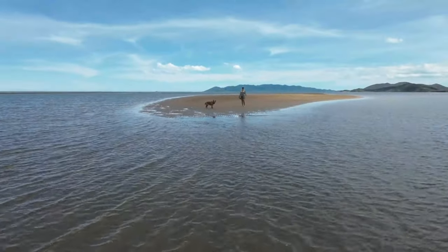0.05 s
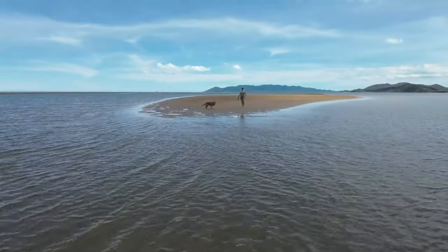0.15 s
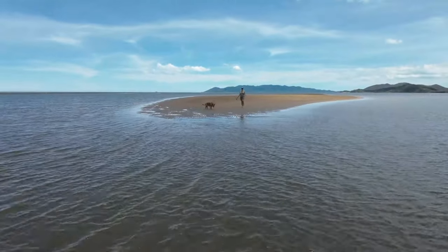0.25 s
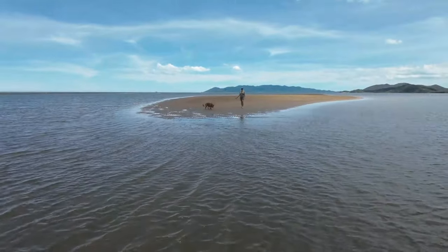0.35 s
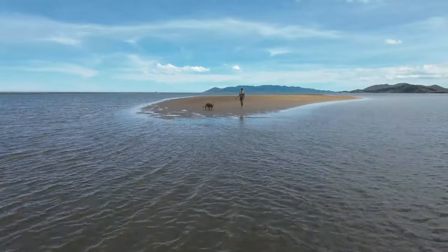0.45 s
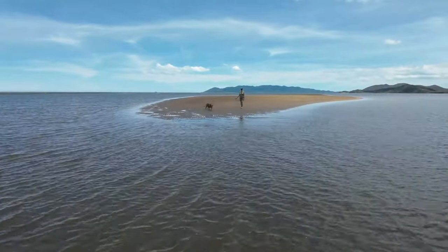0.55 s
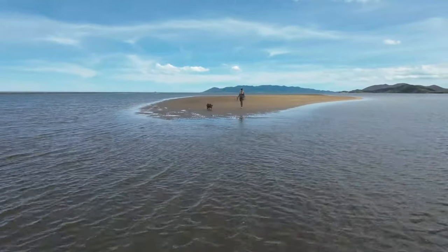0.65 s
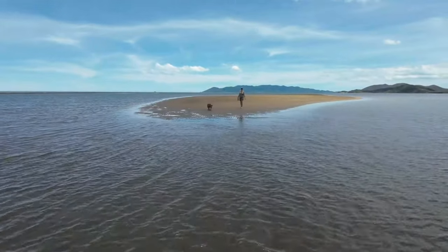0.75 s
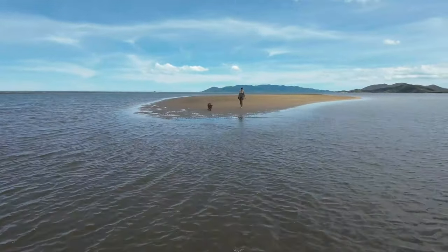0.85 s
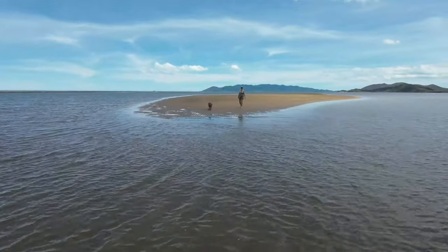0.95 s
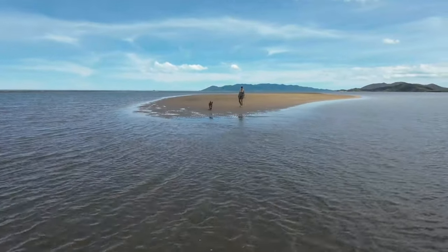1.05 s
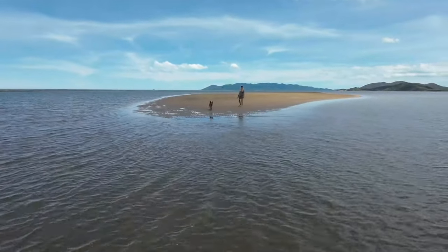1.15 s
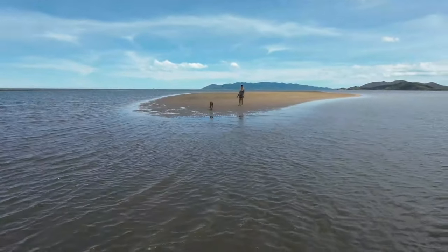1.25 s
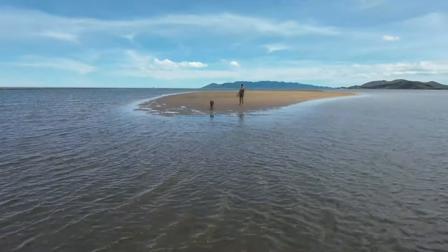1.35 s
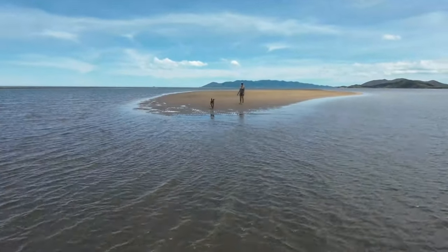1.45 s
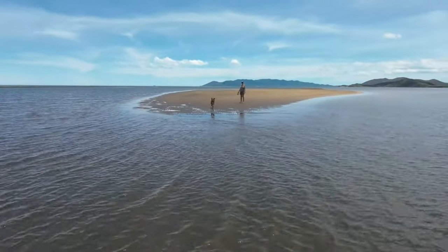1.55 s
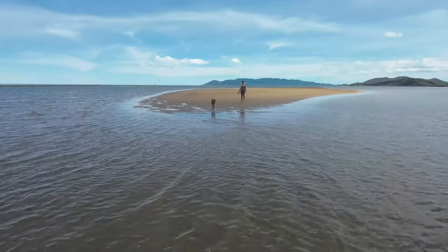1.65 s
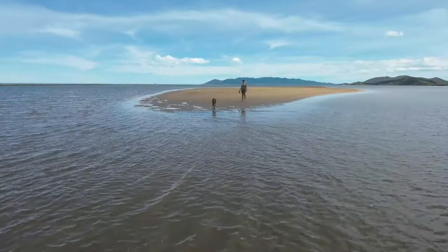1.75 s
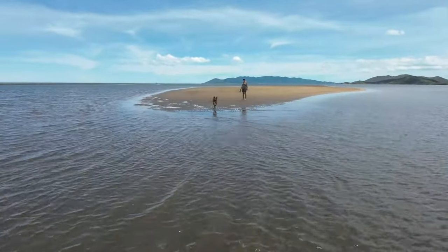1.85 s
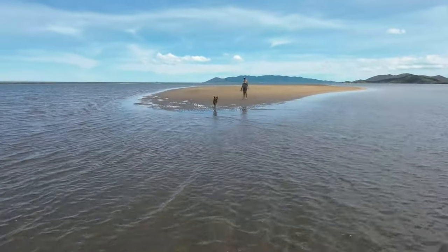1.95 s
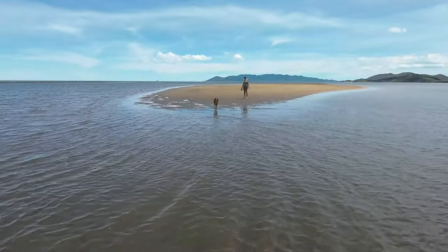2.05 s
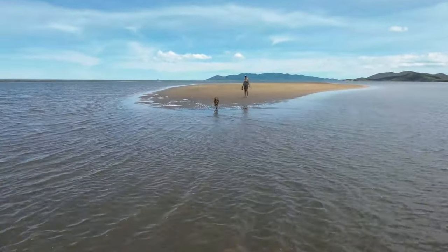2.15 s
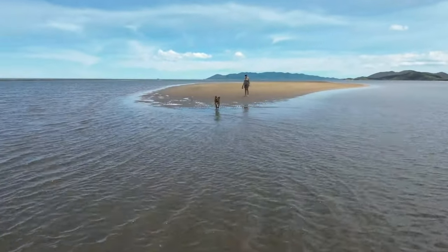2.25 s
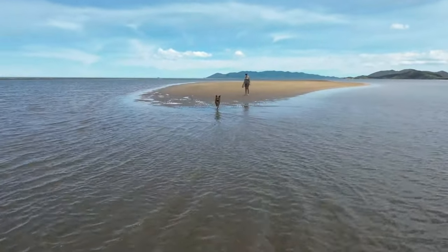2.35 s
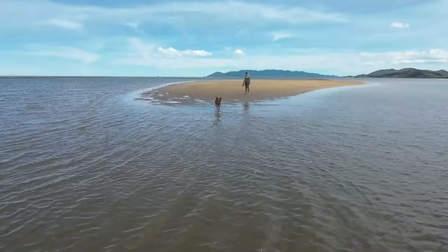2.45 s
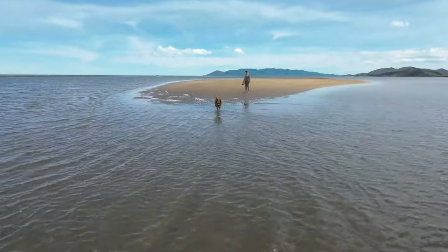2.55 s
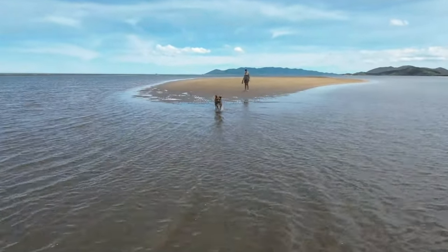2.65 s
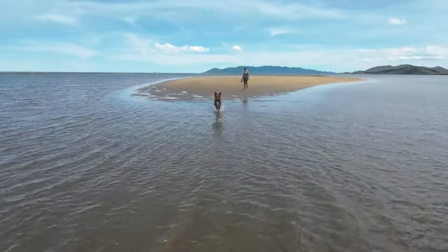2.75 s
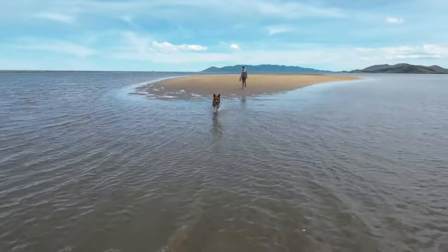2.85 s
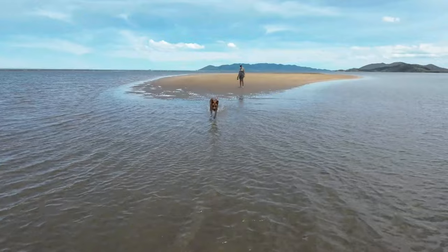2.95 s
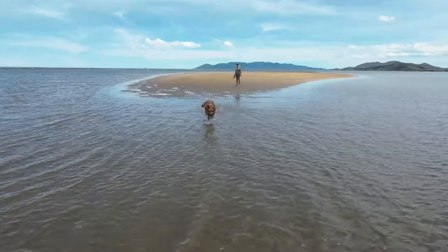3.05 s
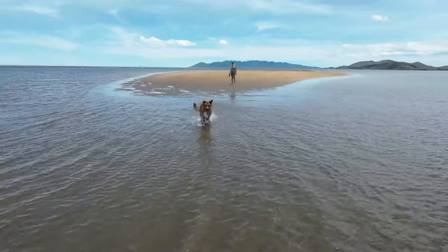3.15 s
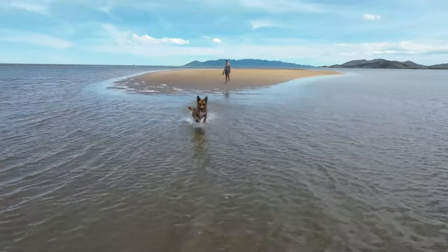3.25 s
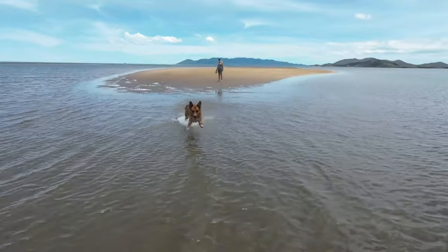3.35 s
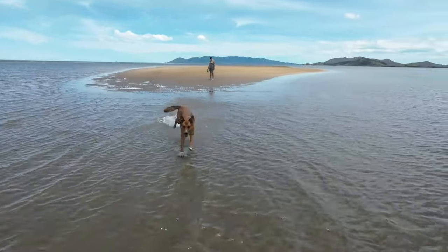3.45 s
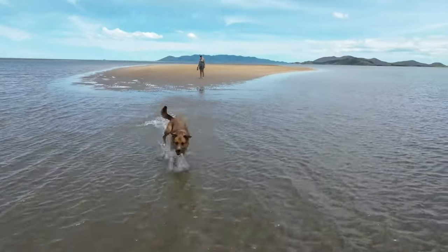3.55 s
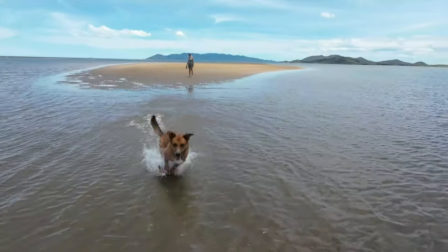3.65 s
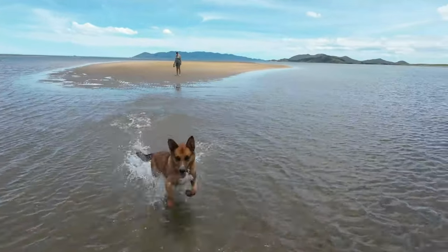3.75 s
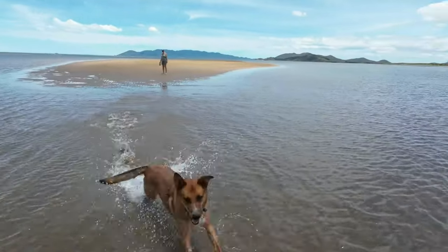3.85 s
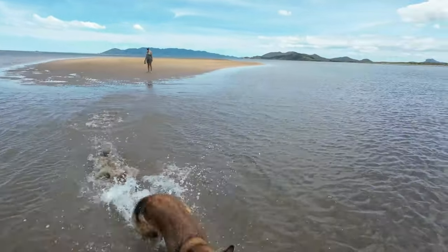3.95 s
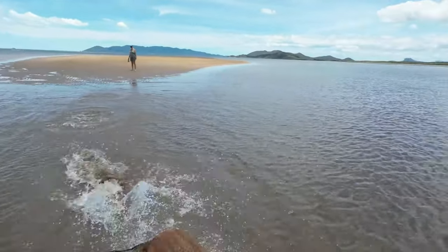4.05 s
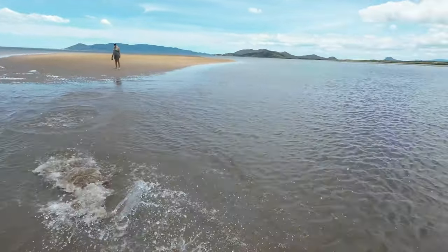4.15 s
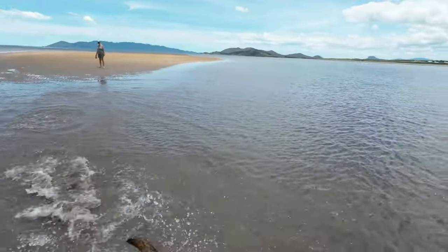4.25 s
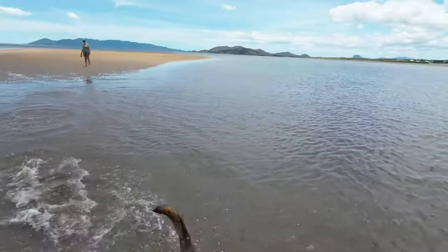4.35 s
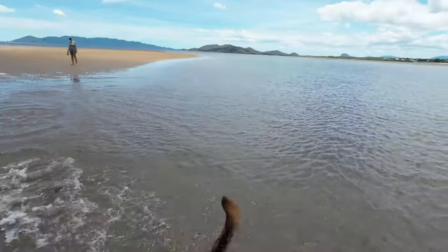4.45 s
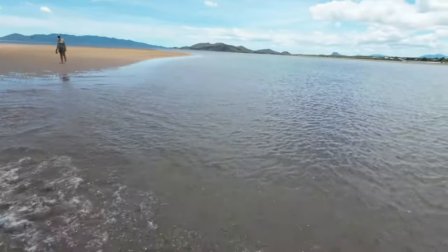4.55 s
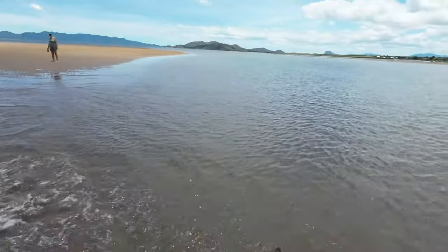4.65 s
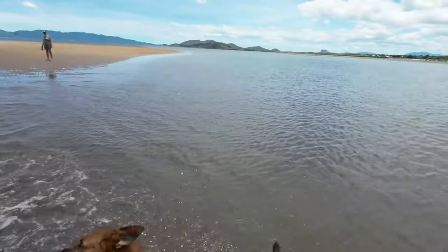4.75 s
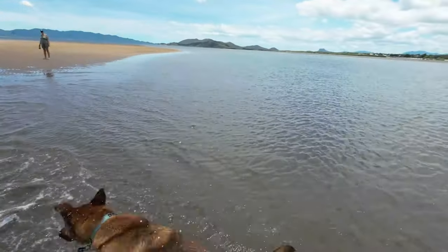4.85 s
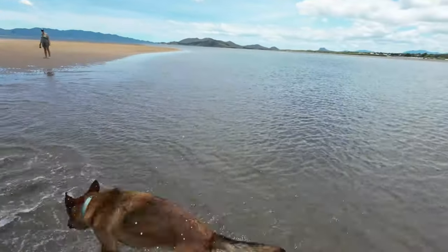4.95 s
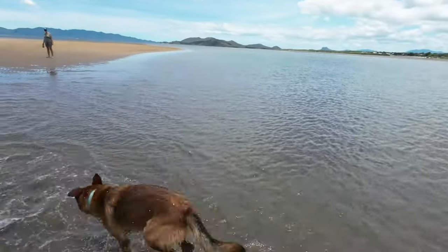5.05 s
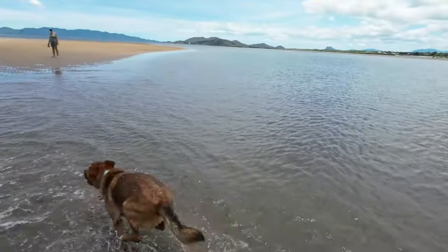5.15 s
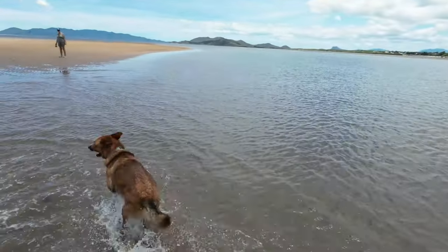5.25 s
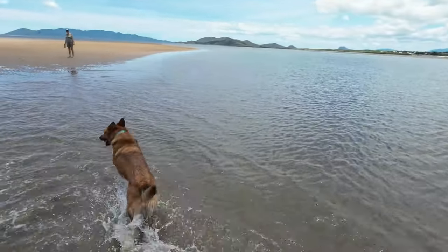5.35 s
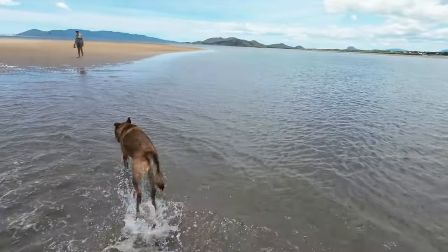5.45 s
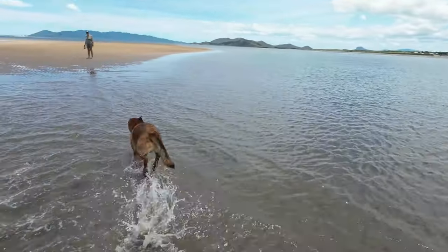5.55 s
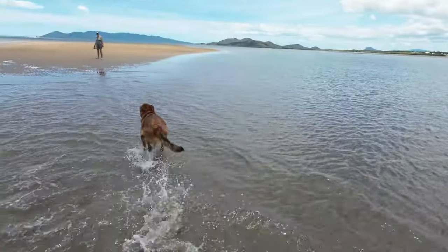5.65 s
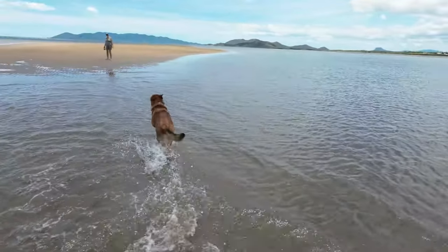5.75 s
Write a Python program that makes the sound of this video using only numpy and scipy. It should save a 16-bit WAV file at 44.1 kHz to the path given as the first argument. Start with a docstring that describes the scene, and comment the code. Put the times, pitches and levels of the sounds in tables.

```python
"""A dog gallops through shallow seawater: its splashes throw spray, fold air under and leave hissing foam.
Before it come slow wading strides, and wind buffets the hand-held microphone throughout.
Water is built from ringing bubbles, fizzing droplets and short slaps; wind is low noise with single swings.
The strongest gusts and splashes overload the input, which flattens their peaks."""
import sys
import numpy as np
from scipy import signal
from scipy.fft import rfft, irfft, next_fast_len
from scipy.io import wavfile
from scipy.ndimage import uniform_filter1d

SR = 44100
rng = np.random.default_rng(int(sys.argv[2]) if len(sys.argv) > 2 else 0)


def unload_wav(signal):
    """Save mono or channel-first audio to the path in sys.argv[1] as 16-bit WAV at rate SR, clipped to [-1, 1]."""
    wavfile.write(
        sys.argv[1],
        SR,
        np.round(np.clip(np.atleast_2d(signal).T, -1, 1) * 32767).astype(np.int16),
    )


N = 256301  # length in samples

# slow strength of the wind: time_s, level_db
WIND_CURVE = [(0.0, -15.5), (0.26, -15.5), (0.43, -19.5), (0.52, -12.5), (0.83, -13.5), (1.2, -12.5),
              (1.38, -18), (1.46, -27), (1.57, -13.5), (1.72, -17.5), (1.87, -6.5), (1.99, -28),
              (2.05, -11.5), (2.35, -18), (2.5, -13.5), (2.6, -17.5), (2.9, -14.5), (3.0, -17),
              (3.2, -14.5), (3.4, -20), (3.7, -19.5), (4.1, -21), (4.22, -23), (4.37, -14), (4.5, -21),
              (4.59, -6.5), (4.68, -10.5), (4.73, -15), (5.2, -12), (5.28, -11.5), (5.36, -5), (5.4, -20),
              (5.81, -13)]
# eddies that strike the microphone: time_s, level_db, swing_hz
EDDIES = [(0.183, -1, 47.7), (0.325, -4, 43.6), (0.568, -8, 64.4), (0.605, -2.5, 71.5), (0.717, -1, 61),
          (0.779, -2, 50.4), (0.92, -3.5, 75), (1.011, -9.5, 66.3), (1.079, -4.5, 45.4), (1.233, -3, 81.5),
          (1.435, -2.5, 55), (1.545, -3.5, 43.6), (1.595, -2.5, 59), (1.817, -8, 66.6), (1.855, -13, 52),
          (1.908, -2, 59), (2.02, -5, 54), (2.256, -8, 47.7), (2.415, -5, 45), (3.097, -2, 57.4),
          (3.197, -3, 53.3), (3.859, -4.5, 52.7), (4.035, -4, 46), (4.288, -3.5, 72), (4.379, -7.5, 57),
          (4.49, -0.5, 75.6), (4.583, -6, 70.6), (4.729, -0.5, 89), (4.786, 0, 40), (4.904, -1, 76.4),
          (5.161, -1.5, 60.6), (5.213, 0.5, 68), (5.344, 3.5, 60.6), (5.747, -2.5, 71), (5.792, 0.5, 46)]
# short low whumps of air and dragged water: peak_s, level_db
LOW_WHUMPS = [(0.73, -25), (0.87, -24.5), (1.0, -23.5), (1.23, -26), (1.41, -31), (1.86, -19), (2.05, -32),
              (2.15, -29), (2.27, -23), (2.35, -28), (2.57, -24), (2.96, -35), (3.22, -41.5), (3.69, -16.5),
              (4.111, -7), (4.29, -25), (4.54, -7.5), (4.6, -13), (4.73, -15), (4.9, -22), (5.21, -9.5),
              (5.35, -19.5), (5.8, -16.5)]
# single clear bubbles: start_s, level_db, pitch_hz
CLEAR_BUBBLES = [(0.024, -21.5, 1880), (0.132, -31.5, 3050), (0.279, -24, 1240), (0.414, -9.5, 496),
                 (0.501, -19, 1060), (0.512, -16, 362), (0.731, -9.5, 1230), (0.732, -14, 660),
                 (1.048, -13.5, 637), (1.15, -22.5, 3100), (1.307, -15, 480), (1.345, -6.5, 402),
                 (1.361, -16.5, 1590), (1.589, -16, 830), (1.615, -14, 1010), (1.654, -13.5, 1000),
                 (1.677, -12.5, 320), (1.72, -8.5, 1015), (1.736, -12, 630), (1.765, -10, 880),
                 (1.775, -13, 484), (1.896, -9, 1010), (1.933, -23, 1660), (2.133, -19.5, 1000),
                 (2.21, -7.5, 405), (2.242, -17, 380), (2.756, -15, 436), (2.887, -16.5, 940),
                 (3.067, -19.5, 814), (3.129, -17, 406), (3.177, -13, 724), (3.289, -15, 1410),
                 (3.561, -12, 470), (3.781, -10, 704), (3.976, 0, 456), (4.036, -5, 568),
                 (4.105, -7.5, 1180), (4.108, -11, 880), (4.136, -10, 440), (4.219, -6.5, 516),
                 (4.298, -7, 547), (4.451, -9, 1090), (4.464, -8, 755), (4.48, -15, 450), (4.518, -5, 627),
                 (4.535, -2, 1550), (4.603, -5, 363), (4.791, -1.5, 463), (4.805, -9.5, 1150),
                 (5.032, -7.5, 1090), (5.213, -7, 410), (5.24, -12, 1450), (5.247, -4, 530),
                 (5.418, -10.5, 466), (5.458, -13, 840), (5.653, -11, 500), (5.727, -9.5, 500)]
# paws, legs and heavy drops slapping the surface: start_s, strength_db, brightness (0 to 1)
SURFACE_SLAPS = [(0.0882, -30, 0.9), (0.639, -25, 0.6), (0.7716, -19.5, 0.4), (0.866, -16, 0.3),
                 (0.894, -14, 1), (0.9856, -11, 1), (1.0523, -15, 0.1), (1.1233, -30, 0.5),
                 (1.148, -23, 0.1), (1.643, -16, 0), (1.8164, -15, 0.3), (1.8677, -27, 0.2),
                 (1.902, -15, 0.3), (1.952, -15, 0.1), (2.133, -24.5, 0.05), (2.2263, -24, 0.9),
                 (2.2774, -22, 0.06), (2.625, -18, 0.6), (2.6433, -13.5, 0.3), (2.758, -9, 1),
                 (2.798, -17, 0.5), (2.8449, -15, 0.2), (2.8803, -22.5, 0.4), (2.9417, -24, 0.4),
                 (2.9741, -26, 0.9), (3.065, -11, 0.27), (3.0974, -15.5, 0.7), (3.191, -20, 0.9),
                 (3.239, -13.5, 0.6), (3.288, -14, 1), (3.526, -8.5, 1), (3.5794, -7.5, 0.5),
                 (3.678, -3, 0), (3.7644, -0.5, 0.4), (3.8454, -20, 0.6), (3.9751, 7, 0.2),
                 (4.098, 0.5, 0.16), (4.364, -4, 0.6), (4.4496, -2, 0.4), (4.9023, -12, 0.5),
                 (4.9621, -17, 0.7), (4.9835, -11, 0.6), (5.055, -8, 1), (5.085, -6.5, 0.4),
                 (5.1478, -9, 0.6), (5.2175, -15, 0.5), (5.478, -18, 0), (5.6523, -10, 0),
                 (5.701, -11, 0.5)]
# wading strides: foot_plunges_s, leg_breaks_free_s, babble_db, spray_db, spray_fall_db_per_s
WADING_STRIDES = [(-0.5, 0.0, -34, -41, 90), (0.388, 1.02, -29.5, -30.5, 140),
                  (1.312, 1.924, -29.5, -30, 143), (2.195, 2.74, -30.5, -30, 39)]
# wading water slops over and folds air under: peak_s, air_pockets_db, babble_db
WADING_SLOSHES = [(0.419, -21, -33), (0.5, -21, -29), (0.55, -29, -29.5), (0.62, -28.5, -29),
                  (0.74, -28, -26.5), (0.85, -30.5, -49), (1.05, -31.5, -28.5), (1.14, -36, -37),
                  (1.34, -31.5, -29.5), (1.42, -49, -29.5), (1.54, -27.5, -43), (1.619, -22, -25),
                  (1.74, -25, -24.5), (1.79, -25, -22), (1.92, -28.5, -27.5), (2.15, -47, -31.5),
                  (2.22, -23, -30), (2.28, -26, -36), (2.33, -26.5, -29.5), (2.45, -28.5, -32),
                  (2.58, -22.5, -26), (2.66, -28, -28), (2.8, -34, -30), (2.93, -32.5, -33)]
# the wading leg flings handfuls of water: peak_s, spray_db, mist_db
LEG_FLINGS = [(0.03, -54, -60), (0.5, -48, -62), (0.64, -38, -56), (0.79, -42, -38), (0.9, -33, -32),
              (1.0, -40, -38), (1.06, -37, -41), (1.15, -39, -42), (1.42, -40.5, -55), (1.65, -41, -50),
              (1.78, -34, -35), (1.91, -29, -32), (2.23, -47, -58), (2.4, -45, -52), (2.64, -41, -48),
              (2.76, -40, -43)]
# the dog's paws and body hit the water: peak_s, air_pockets_db, babble_db, spray_db, mist_db, spray_build_ms
DOG_SPLASHES = [(3.13, -29, -26, -51, -55, 40), (3.2, -34, -29, -32, -35, 14),
                (3.24, -37, -40, -31, -34.5, 40), (3.331, -24, -26, -52, -53, 40),
                (3.43, -32, -28, -39, -44, 46), (3.53, -37, -22, -27, -31.5, 12),
                (3.584, -42, -21, -26.5, -35, 28), (3.689, -22, -29, -23, -28, 28),
                (3.73, -38, -28, -23, -32, 37), (3.77, -24, -21, -29, -30, 10),
                (3.94, -38, -30, -25.5, -34, 40), (3.978, -20, -15.5, -16, -23.5, 11),
                (4.04, -40, -28, -23, -23.5, 40), (4.111, -35, -16, -17.5, -24, 30),
                (4.15, -35, -24, -26, -30, 30), (4.22, -28, -18, -30, -32, 40),
                (4.28, -14.5, -21, -31, -37, 37), (4.38, -40, -40, -17, -22.5, 100),
                (4.462, -29, -19, -15, -21.5, 46), (4.53, -12.5, -14, -16.5, -21, 23),
                (4.58, -23, -21, -24, -28, 28), (4.618, -25, -14, -25, -28, 38),
                (4.68, -16, -22, -30, -36, 34), (4.739, -13.5, -19, -29, -35, 40),
                (4.809, -12, -17.5, -28, -33, 40), (4.97, -28, -41, -29, -30, 20),
                (5.06, -29, -32, -21.5, -29, 45), (5.15, -34, -37, -34, -32, 33),
                (5.231, -19, -17, -18.5, -32, 28), (5.3, -25.5, -39, -25, -29.5, 77),
                (5.472, -19.5, -18, -23.5, -36, 40), (5.578, -50, -21, -25, -31.5, 83),
                (5.66, -40, -27, -25, -32.5, 20), (5.74, -30, -44, -24.5, -30.5, 50)]
# foam left hissing around the dog: time_s, level_db
FOAM_CURVE = [(3.12, -48), (3.22, -39), (3.5, -33), (3.9, -29.5), (4.2, -27.5), (4.7, -25), (5.2, -28.5),
              (5.4, -33), (5.81, -33.5)]
# wading throws coarser drops than the dog: time_s, largest share of mist that keeps its top octave (0 to 1)
MIST_FINENESS = [(0, 0.54), (2.3, 0.67), (3.0, 0.83), (3.2, 0.94), (5.81, 0.95)]

# Tone colours, each a spectrum whose overall level is evened out: pitch_hz, level_db (per Hz)
# the wind's deep rumble: pitch_hz, level_db
RUMBLE_COLOUR = [(8, -58), (20, 0), (60, -2), (100, -10.5), (140, -17.5), (220, -50), (500, -86)]
# the wind's faster flutter: pitch_hz, level_db
FLUTTER_COLOUR = [(70, -57), (120, 9), (170, 10), (230, -3.5), (350, -42)]
# big air pockets: pitch_hz, level_db
GULP_COLOUR = [(150, -7), (240, -4), (320, -3.5), (450, -4.5), (600, -12.5), (900, -46)]
# middling bubbles: pitch_hz, level_db
BABBLE_COLOUR = [(350, -13.5), (550, 0), (800, 0.5), (1200, -3), (1800, -10.5), (2300, -17.5), (4000, -35)]
# thrown droplets: pitch_hz, level_db
SPRAY_COLOUR = [(1000, 3), (1900, 1.5), (3000, 0.5), (5000, -3), (6800, -8.5), (8500, -14.5), (15500, -34)]
# the smallest drops, and the bright part of slaps: pitch_hz, level_db
MIST_COLOUR = [(4500, -8.5), (6800, -10.5), (8200, -4.5), (9500, -10), (12500, -5), (14000, -11),
               (15600, -16.5)]
# the dull part of slaps: pitch_hz, level_db
SMACK_COLOUR = [(300, -28), (800, 0), (2000, 0), (5000, 3), (8000, -7.5), (15500, -65)]

# Names ending in RISE and FALL are speeds in dB per second
FLUTTER_DB, FLUTTER_SLOPE = -12, 2.08  # flutter grows more steeply than the wind: dB per dB
WHUMP_RISE, WHUMP_FALL = 470, 260
BUFFET_S = 0.0076  # time either side of an eddy's centre for its swing to shrink to about a third
STILL_GULP_DB, STILL_BABBLE_DB, STILL_SPRAY_DB, STILL_MIST_DB = -46, -40.5, -59, -69  # calm water
RING_S, RING_HZ, RING_SLOPE = 0.0066, 500, 0.41  # ring time at this pitch; higher bubbles ring shorter
# a plunging foot leaves a run of ever larger, deeper bubbles: start level, pitches, run time, level change
SINK_DB, SINK_FIRST_HZ, SINK_LAST_HZ, SINK_S, SINK_FADE_DB = -12.5, 558, 264, 0.14, -8.5
BABBLE_AT, BABBLE_RISE, BABBLE_FALL = 0.64, 40, 19  # babble is fullest at this share of the stride
DRAG_RISE, MIST_RISE = 33.6, 40  # spray and mist swell while the leg drags
WADE_MIST_DB, MIST_FALL = -5.5, 1.15  # relative to stride spray; mist falls faster by this plain factor
BOW_S, BOW_START = 0.35, 0.15  # seconds for a whole bow wave; share already built as the foot goes in
GLUG_RISE, GLUG_FALL = 470, 114  # air pockets of a slosh
SLOP_RISE, SLOP_FALL = 200, 100  # babble of a slosh
FLING_RISE, FLING_FALL = 610, 280
DRIP_DB, DRIP_RISE, DRIP_FALL, DRIPS_PER_S = 7, 47, 58, 27  # drips off the lifted leg, relative to its spray
PLUNGE_RISE, PLUNGE_FALL, SHEET_FALL = 274, 286, 103  # the dog's bubbles, then its thrown water
BUILD_DB = 10  # the dog's spray and mist climb this much during their build
FOAM_GULP_DB, FOAM_BABBLE_DB, FOAM_MIST_DB = -1.5, 1.5, -9  # relative to the foam curve
FAINT_DB, STRONG_DB = -68, -40  # mist levels between which the top octave opens up
SLAP_S = 0.0017  # slap decay time
DROPS_PER_S, DROP_DB, DROP_SPREAD_DB = 20, 3.5, 3  # stray drops, relative to spray; spread serves drips too
TICK_DB, TICK_HZ = 1, 3000  # first contact of each slap: level and lowest pitch
EDGE_HZ = 15720  # upper band limit


def gain_of(db):
    """Turns decibels into a plain multiplier."""
    return 10 ** (np.asarray(db) / 20)


def evened(x):
    """Scales a sound to an average (RMS) level of one."""
    return x / np.sqrt(np.mean(x ** 2) + 1e-20)


def column(table, count):
    """One column of a curve table, at every sample."""
    rows = np.array(table)
    return np.interp(np.arange(N) / SR, rows[:, 0], rows[:, count])


def coloured(x, spectrum):
    """Shapes how strong each pitch is, then evens the level."""
    hz, db = np.transpose(spectrum)
    size = next_fast_len(len(x), True)
    bins = np.fft.rfftfreq(size, 1 / SR)
    shape_db = np.interp(np.log(bins + 1), np.log(hz + 1), db)
    return evened(irfft(rfft(x, size) * gain_of(shape_db), size)[:len(x)])


def add(mix, s, sound):
    """Lays a short sound into the mix at s seconds."""
    start = max(round(s * SR), 0)
    part = mix[start:start + len(sound)]
    part += sound[:len(part)]


def flicker(ms, depth_db):
    """A random gain, smoothed over the given milliseconds."""
    chance = uniform_filter1d(rng.standard_normal(N), max(round(ms * SR / 1000), 1))
    return evened(gain_of(depth_db * evened(chance)))


def swells(times, dbs, rise, fall):
    """Summed power of events that climb to their peak and sink again at steady dB per second."""
    coarse = np.arange(0, N, 32)  # every 32nd sample is enough for slow levels
    late = coarse[:, None] / SR - np.asarray(times)
    power = (gain_of(dbs + np.minimum(late * rise, -late * fall)) ** 2).sum(axis=1)
    return np.interp(np.arange(N), coarse, power)


def wind():
    """Low turbulence at the microphone, with single eddies swinging the membrane once or twice."""
    wind_db = column(WIND_CURVE, count=1)
    out = gain_of(wind_db) * coloured(rng.standard_normal(N), RUMBLE_COLOUR) * flicker(40, 1.2)
    flutter_power = gain_of(FLUTTER_DB + FLUTTER_SLOPE * wind_db) ** 2
    flutter_power += swells(*np.transpose(LOW_WHUMPS), WHUMP_RISE, WHUMP_FALL)
    out += np.sqrt(flutter_power) * coloured(rng.standard_normal(N), FLUTTER_COLOUR) * flicker(25, 3.7)
    t = np.arange(-.1 * SR, .1 * SR) / SR
    for (s, db, hz), turn in zip(EDDIES, rng.random((len(EDDIES), 1))):
        swing = np.exp(-(t / BUFFET_S) ** 2) * np.cos(2 * np.pi * (hz * t + turn))
        add(out, s + t[0], gain_of(db) * swing)
    return out


def levels():
    """Gains of air pockets, babble, spray, mist and drips; powers add, so the square root comes last."""
    plunge, free, babble_db, spray_db, fall = np.transpose(WADING_STRIDES)
    slosh, slosh_gulp_db, slosh_babble_db = np.transpose(WADING_SLOSHES)
    fling, fling_spray_db, fling_mist_db = np.transpose(LEG_FLINGS)
    hit, hit_gulp_db, hit_babble_db, hit_spray_db, hit_mist_db, build_ms = np.transpose(DOG_SPLASHES)
    build = 1000 * BUILD_DB / np.maximum(build_ms, 2)  # dB per second
    foam = gain_of(column(FOAM_CURVE, count=1)) ** 2
    t = np.arange(N) / SR

    gulp = swells(slosh, slosh_gulp_db, GLUG_RISE, GLUG_FALL)
    gulp += swells(hit, hit_gulp_db, PLUNGE_RISE, PLUNGE_FALL)
    gulp += gain_of(FOAM_GULP_DB) ** 2 * foam + gain_of(STILL_GULP_DB) ** 2

    # the leg drags from its plunge until just after it breaks free
    dragging = sum(np.clip((t - a) / 0.029, 0, 1) * np.clip((b - t) / 0.092 + 1, 0, 1)
                   for a, b in zip(plunge, free))
    fullest = plunge + BABBLE_AT * (free - plunge)
    babble = dragging ** 2 * swells(fullest, babble_db, BABBLE_RISE, BABBLE_FALL)
    babble += swells(slosh, slosh_babble_db, SLOP_RISE, SLOP_FALL)
    babble += swells(hit, hit_babble_db, PLUNGE_RISE, PLUNGE_FALL)
    babble += gain_of(FOAM_BABBLE_DB) ** 2 * foam + gain_of(STILL_BABBLE_DB) ** 2

    drops = foam + gain_of(STILL_SPRAY_DB) ** 2
    drops += swells(hit, hit_spray_db, build, SHEET_FALL)
    drops += swells(fling, fling_spray_db, FLING_RISE, FLING_FALL)
    mist = gain_of(FOAM_MIST_DB) ** 2 * foam + gain_of(STILL_MIST_DB) ** 2
    mist += swells(hit, hit_mist_db, build, SHEET_FALL)
    mist += swells(fling, fling_mist_db, FLING_RISE, FLING_FALL)
    for a, b, db, f in zip(plunge, free, spray_db, fall):
        bow_wave = np.clip((t - a) / BOW_S + BOW_START, 0, 1) ** 3.0
        drops += bow_wave * swells([b], db, DRAG_RISE, f)
        mist += bow_wave * swells([b], db + WADE_MIST_DB, MIST_RISE, MIST_FALL * f)

    drips = swells(free, spray_db + DRIP_DB, DRIP_RISE, DRIP_FALL)
    return np.sqrt([gulp, babble, drops, mist, drips])


def bubble(hz, ring_s, drift):
    """A pocket of air rings and dies; its pitch climbs with positive drift and sinks with negative."""
    t = np.arange(round(4 * ring_s * SR) + 8) / SR
    shape = (1 - np.exp(-t * hz * 3.7)) * np.exp(-(t / ring_s) ** 0.98)
    return shape * np.sin(2 * np.pi * hz * (t + drift * t ** 2 / (2 * ring_s)))


def swarm(lo_hz, hi_hz, cycles, per_s, spread_db, count=28):
    """Many bubbles at random moments, mostly weak, a few strong; about equal power per Hz."""
    out, (when, size, sign) = np.zeros(N), rng.random((3, N))
    strength = gain_of(-spread_db * np.log(size + 0.00078))
    train = (when < per_s / SR) * strength * np.sign(sign - .5)
    kind = rng.integers(0, count, N)
    for k, hz in enumerate(np.geomspace(lo_hz, hi_hz, count)):
        grain = bubble(hz, cycles * rng.uniform(0.66, 2.01) / hz, rng.uniform(-0.033, 0.14))
        grain /= np.linalg.norm(grain)
        out += np.sqrt(hz) * signal.oaconvolve(train * (kind == k), grain)[:N]
    return evened(out)


def churn(gulp_gain, babble_gain):
    """Water folds in air: big pockets glug, middling bubbles babble, and single bubbles ring out."""
    # plain noise fills in between the bubbles
    gulps = swarm(159.0, 802, 2.45, 260, 3.7) + 0.34 * rng.standard_normal(N) * np.sqrt(SR / 1300)
    babble = swarm(415.0, 3480, 3.05, 1500, 3.07) + 0.46 * rng.standard_normal(N) * np.sqrt(SR / 6000)
    out = gulp_gain * coloured(gulps, GULP_COLOUR) + babble_gain * coloured(babble, BABBLE_COLOUR)
    drifts = rng.uniform(-0.072, 0.047, (len(CLEAR_BUBBLES), 1))
    for (s, db, hz), drift in zip(CLEAR_BUBBLES, drifts):
        ring_s = RING_S * (RING_HZ / hz) ** RING_SLOPE
        add(out, s, gain_of(db) * bubble(hz, ring_s, drift))
    # the first foot is already in the water, so it leaves no run of bubbles
    later_plunges = np.transpose(WADING_STRIDES)[0][1:]
    for plunge, run in zip(later_plunges, rng.random((len(WADING_STRIDES), 7))):
        for part in (np.arange(len(run)) + run) / len(run):
            hz = SINK_FIRST_HZ * (SINK_LAST_HZ / SINK_FIRST_HZ) ** part
            level = gain_of(SINK_DB + SINK_FADE_DB * part)
            add(out, plunge + part * SINK_S, level * bubble(hz, 2.5 / hz, -0.05))
    return out


def spray(spray_gain, mist_gain):
    """Droplets fizz and patter over a fine hiss; the smallest drops tick as mist, brighter when strong."""
    surge = flicker(4.4, 1.34) * flicker(24, 0.81)  # handfuls of drops land together
    fizz = swarm(1190, 8860, 2.9, 2500, 2.8) + 1.4 * rng.standard_normal(N)
    ticks = swarm(4600, 17700, 0.73, 500, 4.8, count=12) + 2.15 * rng.standard_normal(N)
    bright = coloured(ticks * surge, MIST_COLOUR)
    dull = evened(signal.lfilter(*signal.butter(3, 8500, fs=SR), bright))
    mist_db = 20 * np.log10(mist_gain)
    opening = np.clip((mist_db - FAINT_DB) / (STRONG_DB - FAINT_DB), 0, 1)
    share = opening * np.clip(column(MIST_FINENESS, count=1), 0, 1)
    mist = mist_gain * (share * bright + (1 - share) * dull)
    return spray_gain * coloured(fizz * surge, SPRAY_COLOUR) + mist


def slaps(spray_gain, drip_gain):
    """Each slap is a wide burst of noise that swells in about a millisecond and dies within a few."""
    t, (when, size, bright) = np.arange(2000) / SR, rng.random((3, N))
    drop_gain = spray_gain * gain_of(DROP_DB - DROP_SPREAD_DB * np.log(size + 0.039))
    hits = (when < DROPS_PER_S / SR) * drop_gain
    drip = when > 1 - DRIPS_PER_S / SR
    hits += drip * drip_gain * gain_of(-DROP_SPREAD_DB * np.log(size + 0.016))
    bright[drip] = 0.74 + 0.36 * bright[drip]
    for s, db, shine in SURFACE_SLAPS:
        place = round(s * SR)
        hits[place], bright[place] = gain_of(db), np.clip(shine, 0, 1)
    burst = (1 - np.exp(-t / 0.0024)) * np.exp(-t / SLAP_S)
    body = signal.oaconvolve(hits * np.sqrt(np.clip(1 - bright, 0, 1)), burst)[:N]
    edge = signal.oaconvolve(hits * np.sqrt(bright), burst)[:N]
    noise = rng.standard_normal(N)
    contact = hits * np.sqrt(bright) * np.sign(noise)
    tick = signal.lfilter(*signal.butter(2, TICK_HZ, "high", fs=SR), contact)
    wide = body * coloured(noise, SMACK_COLOUR) + edge * coloured(noise, MIST_COLOUR)
    return wide + gain_of(TICK_DB) * tick


def scene():
    """Wind and all the water sounds together, in one channel."""
    gulp, babble, drops, mist, drips = levels()
    return (wind() + churn(gulp, babble) + spray(drops, mist) + slaps(drops, drips))[None]


def record(dry):
    """The input overloads at full scale; then a filter removes the highest treble."""
    clipped = np.clip(dry, -1, 1)
    band_limit = signal.firwin(511, EDGE_HZ, window=("kaiser", 9), fs=SR)
    return signal.oaconvolve(clipped, band_limit[None], "same")


dry = scene()
out = record(dry)
unload_wav(out)
```